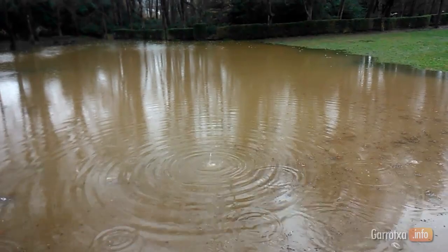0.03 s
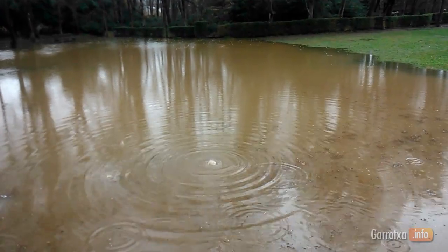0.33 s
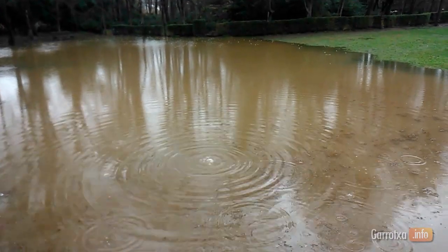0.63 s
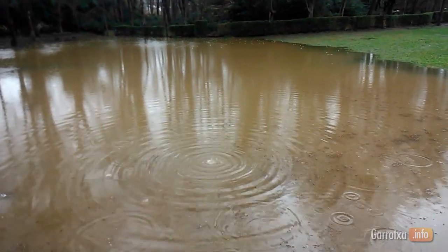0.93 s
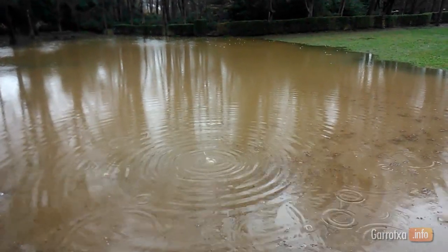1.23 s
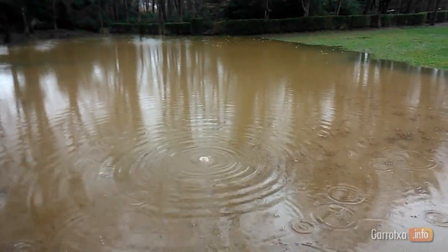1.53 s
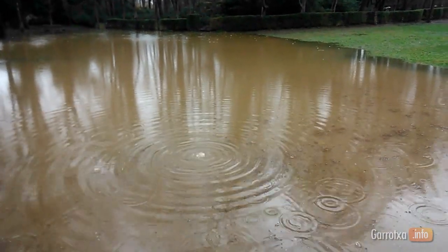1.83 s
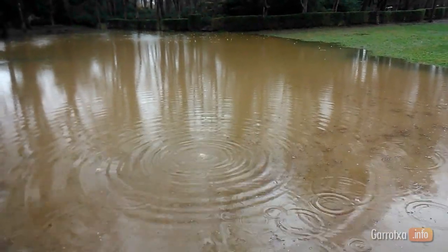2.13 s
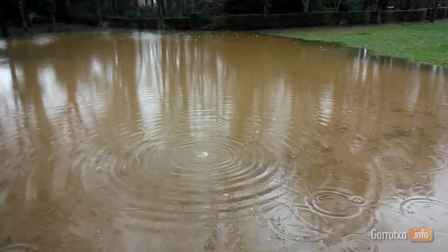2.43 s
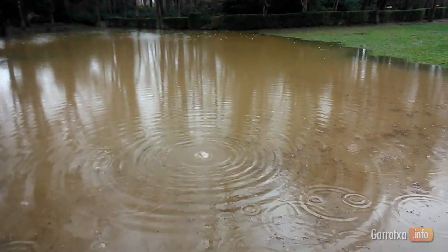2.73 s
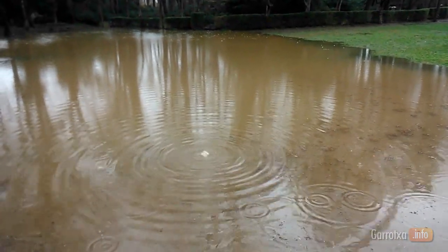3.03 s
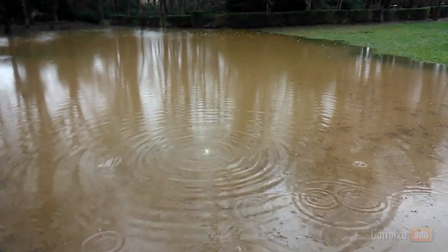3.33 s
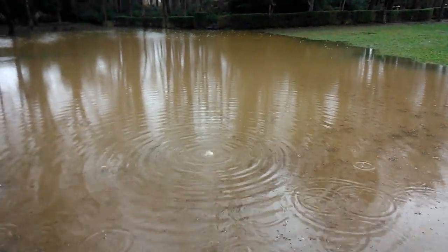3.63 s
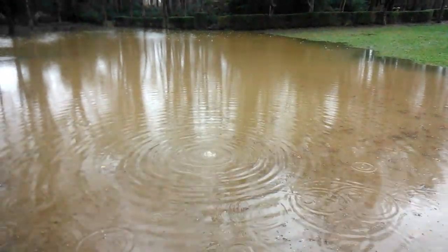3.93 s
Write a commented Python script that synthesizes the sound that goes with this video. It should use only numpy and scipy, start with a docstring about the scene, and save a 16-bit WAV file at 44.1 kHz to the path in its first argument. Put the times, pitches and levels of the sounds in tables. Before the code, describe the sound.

Close, uneven dripping into a pool of muddy water outdoors: small splashes and ticks mix with soft rising bloops and tiny bursting bubbles. A faint watery hiss runs underneath, and the heaviest drop comes late.

```python
"""Drops in a muddy pool

Each drop, heard close and in mono, strikes with a thud, a slap and a bright tick, and a diffuse, grainy,
reverberant tail with bright treble dies away after it. Trapped air resonates: large bubbles rise in soft
upward bloops, small ones plink and burst, and air squeezed from the mud whistles thinly. Underneath,
the water surges, plops and trickles. All stops shortly before the end."""
import sys
import numpy as np
from scipy import signal
from scipy.fft import rfft, irfft, next_fast_len
from scipy.io import wavfile
from scipy.ndimage import uniform_filter1d

SR = 44100
rng = np.random.default_rng(int(sys.argv[2]) if len(sys.argv) > 2 else 0)


def materialize(psi):
    """Save the field psi as 16-bit PCM at rate SR to the path in sys.argv[1].

    A 1-D psi becomes a single channel; in a 2-D psi each row is a channel.
    """
    bounded = np.clip(np.atleast_2d(psi).T, -1, 1)
    quanta = np.round(bounded * 32767).astype(np.int16)
    wavfile.write(sys.argv[1], SR, quanta)


N = 176400
T = np.arange(N) / SR
CUTOFF_HZ = 14050

# Landings, each part before its own gain: t/s, then level/dB of thud, slap, tick, tail body, tail treble
LANDINGS = [(0.01, -53.5, -51, -57, -59.5, -67.5), (0.1836, -54, -50, -28.5, -52, -48),
            (0.4253, -57, -60, -46.5, -67.5, -62), (0.5304, -37, -33.5, -35, -44, -44),
            (0.678, -58, -73, -42, -67.5, -58), (0.8246, -67, -43, -36, -52.5, -57),
            (1.0181, -37.5, -35, -36, -40.5, -54), (1.0337, -49.5, -29, -35, -51.5, -50),
            (1.1194, -67, -36.5, -51, -46, -47.5), (1.3501, -79, -70, -36.5, -53, -52),
            (1.5613, -59, -57, -43, -60.5, -53.5), (1.6506, -45.5, -39, -28, -48, -46),
            (1.7185, -53.5, -57, -31.5, -51, -45), (1.844, -81, -60, -44.5, -60, -49.5),
            (1.8635, -66.0, -60, -40, -54, -51.5), (1.991, -32, -27, -40, -43.5, -46.5),
            (2.1077, -54, -36.5, -59, -51.0, -51), (2.1811, -68, -44, -51, -51, -53.5),
            (2.2101, -43.5, -40, -44, -60, -60), (2.324, -58, -75, -45, -58.5, -55),
            (2.386, -56.5, -53, -45.5, -59, -56), (2.4347, -56, -50.5, -32.5, -54.5, -50.5),
            (2.5373, -60, -70, -50, -61, -54), (2.5848, -82, -79, -47, -64, -61),
            (2.6845, -72, -64, -44, -58.5, -51), (2.7345, -68, -52, -35.5, -49.5, -46),
            (2.7611, -52.5, -50, -36, -59, -50), (2.8059, -42, -45.5, -43, -53.5, -54),
            (2.894, -72, -74, -44, -59, -56), (2.918, -80, -51, -41, -64, -73.5),
            (3.017, -60, -54, -46, -46.5, -50), (3.0465, -48, -50, -38, -45, -49),
            (3.0687, -16.5, -26.5, -34.5, -41.5, -45.5), (3.1933, -54, -66, -45, -58, -63),
            (3.219, -78.5, -46.5, -78, -70, -65.5), (3.2652, -57.5, -48.5, -55.0, -59.5, -60),
            (3.39, -47.5, -57, -45.5, -57, -57.5), (3.424, -79.5, -52, -65, -84, -59),
            (3.6417, -77, -60, -45, -65, -56.5), (3.6645, -55, -66, -45, -61, -54),
            (3.771, -55, -61, -39, -64.5, -52.5)]
# Modes of the cavity punched by a heavy drop: f/Hz, relative level/dB, t60/s
CAVITY_MODES = [(1783, -14.5, 0.014), (3184, -21.5, .016), (9260, -25, 0.014)]
# Spectra of the slap and the tick: f/Hz, relative level/dB
SLAP_SPECTRUM = [(200, -11.5), (500, -0.5), (1100, 1), (2000, -1), (3200, -8), (4500, -7), (7000, -15.5),
                 (14000, -53)]
TICK_SPECTRUM = [(300, -24), (2000, -20.5), (4500, -11), (7000, -7), (9600, 2.5), (11500, -5), (14000, -4)]
def impacts(heavy_db=-22):
    """Impact excitation: a thud, a double slap and a tick; the heavier the drop, the more cavity ring."""
    out, t = np.zeros(N), T[:1024]
    thud = np.sin(2 * np.pi * 350 * t) * np.exp(-t / 0.00073)
    thud = signal.sosfilt(signal.butter(1, 180, "high", fs=SR, output="sos"), -thud)
    cavity = sum(from_db(db) * np.sin(2 * np.pi * hz * t) * from_db(-60 * t / t60)
                 for hz, db, t60 in CAVITY_MODES)
    for s, thud_db, slap_db, tick_db, _, _ in LANDINGS:
        hollowness = from_db(0.34 * (thud_db - heavy_db))
        add(out, s, pulse(thud - hollowness * cavity, thud_db - 2.5))
        slap = crack(SLAP_SPECTRUM, slap_db - 2) / (1 + hollowness ** 2)
        add(out, s, slap)
        add(out, s + 0.00288 * rng.uniform(.5, 1), from_db(-8) * slap)
        add(out, s, crack(TICK_SPECTRUM, tick_db - 0.5))
    return out


# Spectra of the reverberant tail's body and treble: f/Hz, relative level/dB
BODY_SPECTRUM = [(50, 3), (110, 7), (170, 2), (300, 0.5), (700, 0.5), (1300, -3), (2000, 0), (4000, -3.5),
                 (6000, -6.5), (12000, -21)]
TREBLE_SPECTRUM = [(1500, -32), (4000, -10), (6000, -5.5), (8000, -2.5), (9500, 2), (11000, -3),
                   (14000, -6.5)]
def reverberant_tails():
    """Reverberant decay: a diffuse, grainy tail with bright treble dies away after each drop."""
    times, _, _, _, body_db, treble_db = np.transpose(LANDINGS)
    body = from_db(-1) * diffuse_noise(BODY_SPECTRUM) * flutter() + from_db(-14) * fizz()
    crackle = rms_one(colour(grains(per_s=490, spread_db=9.5), TICK_SPECTRUM))
    treble = from_db(0.5) * diffuse_noise(TREBLE_SPECTRUM) * flutter() + from_db(-5) * crackle
    body *= tails(times, body_db, attack_s=0.0011, t60=0.25)
    treble *= tails(times, treble_db, attack_s=0.0013, t60=0.27)
    return body + treble


def diffuse_noise(spectrum):
    """Diffuse field: noise whose bands flare and fade independently."""
    edges_hz = np.geomspace(60, CUTOFF_HZ, 14)
    out, white = np.zeros(N), rng.standard_normal((2, N))
    for k, band in enumerate(zip(edges_hz, edges_hz[1:])):
        bandpass = signal.butter(2, band, "band", fs=SR, output="sos")
        out += signal.sosfilt(bandpass, white[k % 2]) * flutter(db=3, per_s=260)
    return rms_one(colour(out, spectrum))


def fizz(pitches=22, per_s=130, t60_cycles=150):
    """Damped resonance: random impulses set off tiny, high rings."""
    out = np.zeros(N)
    for hz in np.geomspace(1300, 6000, pitches):
        radius, angle = from_db(-60 * hz / (t60_cycles * SR)), 2 * np.pi * hz / SR
        kicks = grains(per_s / pitches, spread_db=8.9) + 1e-18
        out += signal.lfilter([0, np.sin(angle)], [1, -2 * radius * np.cos(angle), radius ** 2], kicks)
    return rms_one(out)


# Large bubbles, at the crest of each swell: t/s, f/Hz, relative level/dB, half-length/s
LARGE_BUBBLES = [(0.194, 439, -44.5, 0.02), (0.219, 390.4, -48, 0.018), (0.409, 386, -53, 0.022),
                 (0.615, 490, -47.5, 0.0074), (0.709, 358, -51.5, 0.023), (0.964, 398, -52, 0.012),
                 (1.206, 333.3, -52, 0.027), (1.41, 352, -58, 0.028), (1.447, 586, -51.5, 0.009),
                 (1.495, 400, -59.5, 0.019), (1.571, 647, -45, 0.005), (1.625, 389, -58, 0.025),
                 (1.691, 310, -45, 0.022), (1.723, 472.5, -42, 0.017), (1.876, 374, -53, 0.013),
                 (1.909, 406, -42.5, 0.015), (2.465, 355, -50, 0.013), (2.738, 277.3, -37, 0.012),
                 (2.763, 386, -43.5, 0.015), (2.882, 376, -53.5, 0.012), (3.134, 340.7, -53.5, 0.051),
                 (3.27, 398.3, -42.5, 0.012), (3.686, 365, -43, 0.014), (3.701, 598, -57, 0.018)]
def bloops():
    """Bubble resonance: the pitch of a large air pocket climbs steeply as it rises."""
    return from_db(-4) * swells(LARGE_BUBBLES, octaves_per_s=19, width_hz=10)


# Small bubbles: t/s, starting f/Hz, relative level/dB, t60/s
SMALL_BUBBLES = [(0.469, 3010, -53.5, 0.084), (0.531, 1750, -37, 0.01), (0.579, 4980, -42, 0.024),
                 (0.825, 4730, -34.5, 0.017), (0.836, 3800, -46.5, 0.035), (1.018, 3010, -31.5, 0.018),
                 (1.018, 990, -27.5, 0.0087), (1.032, 3510, -31.5, 0.012), (1.166, 3050, -42.5, 0.019),
                 (1.217, 2170, -48.5, 0.05), (1.239, 2730, -44, 0.03), (1.268, 2880, -47, 0.014),
                 (1.303, 5370, -49, 0.031), (1.439, 1426, -49.5, 0.072), (1.776, 3010, -39.5, 0.044),
                 (1.891, 2020, -50.5, 0.07), (1.991, 1050, -32, 0.013), (1.991, 3950, -37.5, 0.034),
                 (2.157, 2500, -50, 0.028), (2.211, 4080, -46, 0.024), (2.551, 4010, -46.5, 0.042),
                 (2.598, 2950, -54, 0.045), (2.862, 1202, -46.5, 0.05), (3.071, 3950, -31, 0.02),
                 (3.392, 2160, -30.5, 0.0053), (3.46, 2230, -50, 0.019), (3.491, 2005, -55.5, 0.04),
                 (3.764, 4090, -51, 0.034)]
def plinks(neighbours=3, within_s=0.012, spread_octaves=.22):
    """Clustered resonators: each small bubble is followed by weaker, detuned neighbours."""
    out = np.zeros(N)
    for s, hz, db, t60 in SMALL_BUBBLES:
        add(out, s, plink(hz, db, t60))
        for lag, detune in rng.random((neighbours, 2)):
            neighbour_hz = hz * 2 ** (spread_octaves * (2 * detune - 1))
            add(out, s + within_s * lag, plink(neighbour_hz, db - 9.5, t60 / 2))
    return out


def plink(hz, db, t60):
    """Free oscillation: a small bubble starts sharply and rings down, rising in pitch."""
    t = T[:SR // 6]
    ring = (1 - np.exp(-t / 0.00044)) * from_db(-60 * t / t60)
    tone = glide(hz, t, octaves_per_s=5, width_hz=75)
    return from_db(db + 1.5) * ring / np.sqrt(ring.max()) * tone


# Droplets and bursting bubbles: t/s, relative level/dB
DROPLET_TICKS = [(0.0855, -48.5), (0.266, -47.5), (0.419, -49), (0.505, -48), (0.7452, -45.5),
                 (0.85, -47.5), (0.9948, -51), (1.0565, -35.5), (1.1751, -45), (1.264, -50.5),
                 (1.7355, -40), (1.8783, -47), (2.0334, -41.5), (2.046, -45), (2.693, -46), (2.8626, -46.5),
                 (2.9034, -43), (3.0268, -41.5), (3.131, -45), (3.3329, -45.5), (3.6255, -51.5),
                 (3.6846, -49.5)]
def droplets():
    """Impulsive sources: droplets and bursting bubbles give broadband ticks with a short tail."""
    out = np.zeros(N)
    for s, db in DROPLET_TICKS:
        add(out, s, crack(TICK_SPECTRUM, db + 2))
    return out + reverberation(out, db=-7.5)


# Escaping air, at the crest of each swell: t/s, f/Hz, level/dB, half-length/s
AIR_JETS = [(.86, 3520, -59.5, 0.046), (1.45, 6300, -62.5, 0.068), (1.66, 7240, -56, 0.034)]
def whistles():
    """Flow tones: air squeezed from the mud whistles thinly, sinking a little in pitch."""
    return swells(AIR_JETS, octaves_per_s=-.35, width_hz=150)


# Water closing over, at the crest of each swell: t/s, f/Hz, level/dB, half-length/s
CLOSURES = [(.21, 109.3, -53.5, .008), (.315, 254, -59, 0.005), (.355, 236, -61, 0.0085),
            (.436, 70, -56, 0.0097), (2.003, 70.1, -39.5, 0.0077), (2.238, 260, -53.5, 0.013),
            (2.428, 60.04, -47, .02)]
def plops():
    """Cavity collapse: water closes over with a low, steeply falling tone."""
    return swells(CLOSURES, octaves_per_s=-29.5, width_hz=10)


# Surging of the pool: t/s, level/dB
SURGE_LEVEL = [(0, -80), (.55, -66), (.8, -74.5), (1.38, -58), (1.55, -79), (1.92, -60), (2.3, -71),
               (2.43, -65.5), (2.62, -66.5), (2.78, -56.5), (3.25, -64), (3.78, -59.5)]
# Its spectrum: f/Hz, relative level/dB
SURGE_SPECTRUM = [(15, -0.5), (28, -14), (42, 0), (58, 4.5), (80, -0.5), (120, -7.5), (200, -22),
                  (500, -40)]
def rumble():
    """Bulk motion: the pool surges unevenly in the bass and sloshes after each thud."""
    times, thud_db = np.transpose(LANDINGS)[:2]
    slosh = tails(times, np.minimum(thud_db - 10, -46.5), attack_s=0.0011, t60=0.19)
    surge = from_db(np.interp(T, *np.transpose(SURGE_LEVEL))) * flutter(db=3, per_s=16)
    return (surge + slosh) * noise(SURGE_SPECTRUM)


# Trickling between drops: t/s, relative level/dB
TRICKLE_LEVEL = [(0, -57.5), (.15, -59.5), (.36, -64.5), (.47, -58.5), (1.28, -54.5), (1.53, -66),
                 (1.8, -57.5), (2.3, -72.5), (2.4, -58), (2.66, -77), (2.84, -63), (2.98, -62.5),
                 (3.3, -55), (3.6, -61.5), (3.75, -68.5)]
# Its spectrum: f/Hz, relative level/dB
TRICKLE_SPECTRUM = [(100, 8), (500, -5.5), (1500, -3.5), (5000, -4.5), (9500, 0), (14000, -2.5)]
def trickle():
    """Flow noise: moving water gives a faint, finely grained hiss."""
    patter = rms_one(colour(grains(per_s=900, spread_db=2), TRICKLE_SPECTRUM))
    hiss = noise(TRICKLE_SPECTRUM) + from_db(-0.5) * patter
    envelope = from_db(np.interp(T, *np.transpose(TRICKLE_LEVEL)) - 4.5)
    return envelope * hiss * flutter()


def reverberation(x, db, t60=0.26):
    """Diffuse reflection: convolution with exponentially decaying noise."""
    t = T[:SR // 2]
    response = rng.standard_normal(len(t)) * from_db(-60 * t / t60) * (1 - np.exp(-t / 0.0021))
    response /= np.sqrt(np.sum(response ** 2))
    return from_db(db) * signal.fftconvolve(x, response)[:N]


def pulse(shape, db, hold_s=.003):
    """Equal energy: a transient gets the energy of that level held for hold_s."""
    return from_db(db) * shape * np.sqrt(hold_s * SR / np.sum(shape ** 2))


def crack(spectrum, db, attack_s=0.000083, decay_s=0.0012):
    """Broadband transient: a brief burst of coloured noise."""
    t = T[:1024]
    envelope = (1 - np.exp(-t / attack_s)) * np.exp(-t / decay_s)
    return pulse(colour(rng.standard_normal(len(t)) * envelope, spectrum), db)


def tails(times, levels_db, attack_s, t60):
    """Incoherent addition: overlapping envelopes, each falling ever faster, sum in power."""
    power, t = np.zeros(N), T[:SR]
    shape = (1 - np.exp(-t / attack_s)) * from_db(-60 * (t / t60) ** 1.234)
    for s, db in zip(times, levels_db):
        add(power, s, (from_db(db) * shape) ** 2)
    return np.sqrt(power)


def glide(hz, t, octaves_per_s, width_hz):
    """Line broadening: a bubble's wobbling shape makes the phase of its sliding tone wander."""
    wobble = np.cumsum(rng.standard_normal(len(t))) * np.sqrt(2 * np.pi * width_hz / SR)
    cycles = np.cumsum(hz * 2 ** (octaves_per_s * t)) / SR + rng.random()
    return np.sin(2 * np.pi * cycles + uniform_filter1d(wobble, size=32))


def swells(rows, octaves_per_s, width_hz):
    """Amplitude modulation: sliding tones swell and fade with a gurgle about their crests."""
    out, t = np.zeros(N), T[:SR // 2] - T[SR // 4]
    for s, hz, db, half_s in rows:
        envelope = from_db(db) / np.cosh(np.pi / 2 * t / half_s)
        tone = envelope * glide(hz, t, octaves_per_s, width_hz)
        add(out, s + t[0], tone[t + s >= 0])
    return out * flutter(db=3, per_s=220)


def flutter(db=4, per_s=70):
    """Random modulation: a wandering gain of unit rms."""
    knots = np.arange(0, N / SR + 1, 1 / per_s)
    wander = np.interp(T, knots, rng.standard_normal(SR)[:len(knots)])
    return rms_one(from_db(db * wander))


def grains(per_s, spread_db):
    """Shot noise: random clicks of uneven size."""
    sizes = from_db(spread_db * np.minimum(rng.exponential(1, N), 4)) * rng.choice([-1, 1], N)
    return sizes * (rng.random(N) < per_s / SR)


def noise(spectrum):
    """Spectral shaping: coloured Gaussian noise of unit rms."""
    return rms_one(colour(rng.standard_normal(N), spectrum))


def colour(x, spectrum):
    """Minimum-phase filtering: folding the cepstrum makes the response causal."""
    size = 2 * next_fast_len(len(x))
    hz, db = np.transpose(spectrum)
    bins = np.maximum(np.arange(size // 2 + 1) * SR / size, 1)
    gain = from_db(np.interp(np.log(bins), np.log(hz), db))
    cepstrum = irfft(np.log(gain))
    cepstrum[1:size // 2] *= 2
    cepstrum[size // 2 + 1:] = 0
    return irfft(rfft(x, size) * np.exp(rfft(cepstrum)))[:len(x)]


def from_db(db):
    """Amplitude ratio of a level."""
    return 10 ** (np.asarray(db) / 20)


def rms_one(x):
    """Normalisation to unit rms."""
    return x / np.sqrt(np.mean(x ** 2) + 1e-20)


def add(out, s, sound):
    """Superposition of a sound starting at s seconds."""
    i = int(np.clip(s * SR, 0, N - 1))
    out[i:i + len(sound)] += sound[:N - i]


def scene():
    """Linear superposition: drops and bubbles over the moving pool, the same in both ears."""
    ringing = bloops() + plinks() + whistles()
    water = impacts() + droplets() + reverberant_tails() + ringing + reverberation(ringing, db=-14)
    water += rumble() + plops() + trickle()
    return np.array([water, water])


def record(dry, stop_s=3.797, fade_s=0.016):
    """Gating and band limiting: a quick fade-out, then a steep low-pass."""
    fade = np.clip((stop_s - T) / fade_s, 0, 1)
    lowpass = signal.ellip(10, .2, 70, CUTOFF_HZ, fs=SR, output="sos")
    return signal.sosfilt(lowpass, dry * fade + 1e-18)


dry = scene()
out = record(dry)
materialize(out)
```